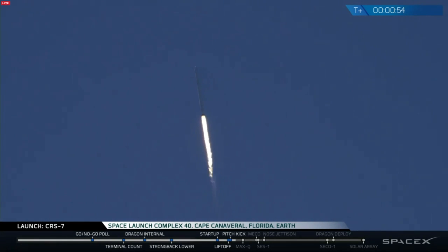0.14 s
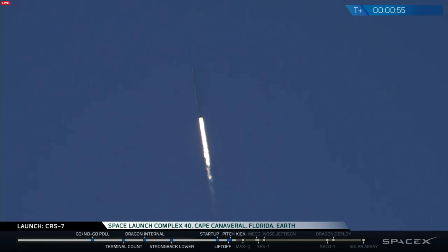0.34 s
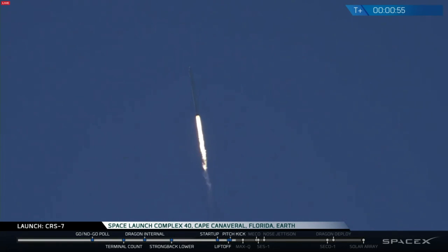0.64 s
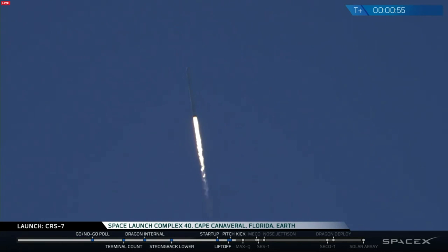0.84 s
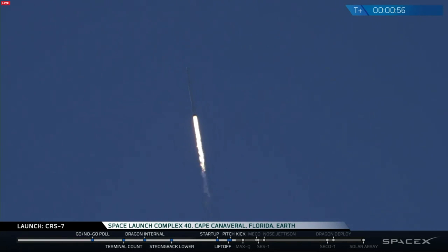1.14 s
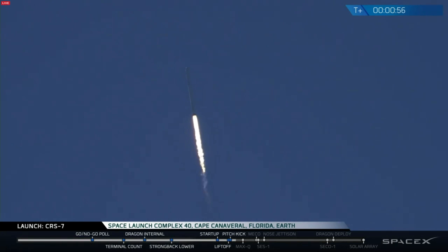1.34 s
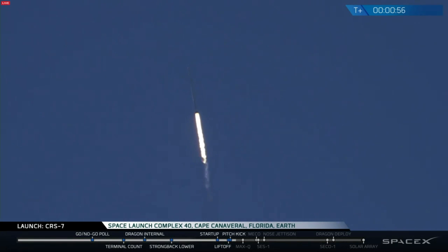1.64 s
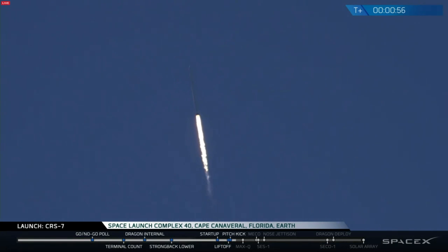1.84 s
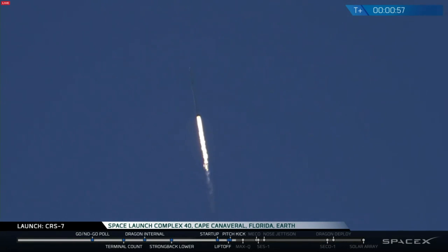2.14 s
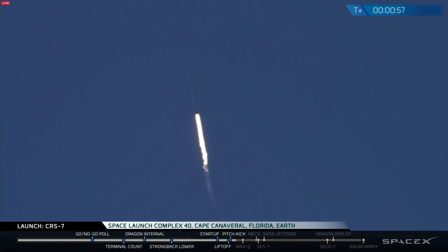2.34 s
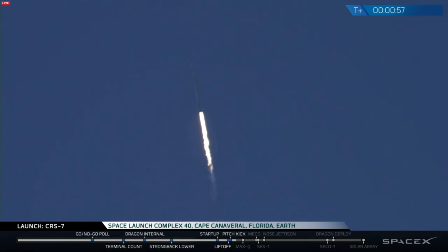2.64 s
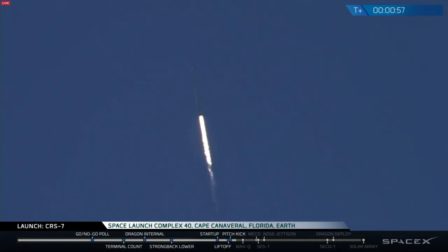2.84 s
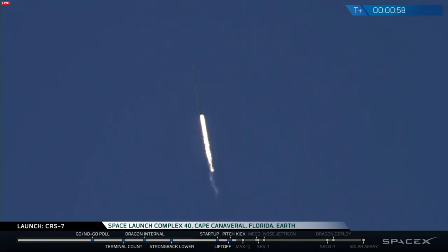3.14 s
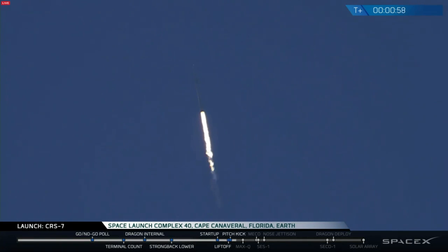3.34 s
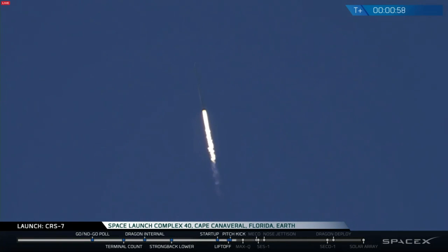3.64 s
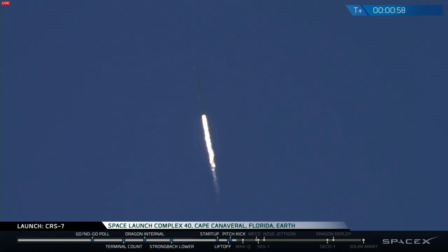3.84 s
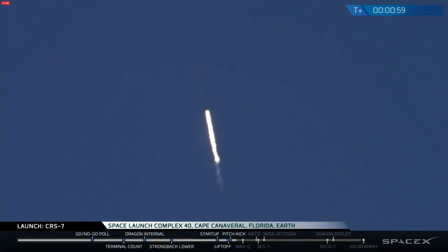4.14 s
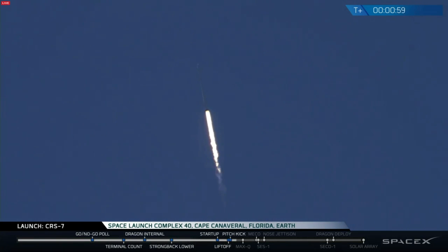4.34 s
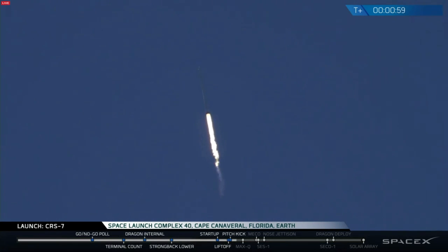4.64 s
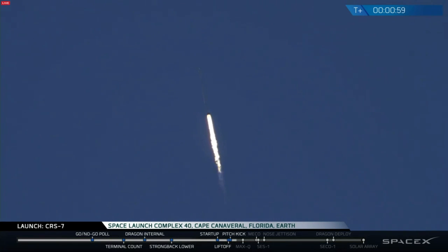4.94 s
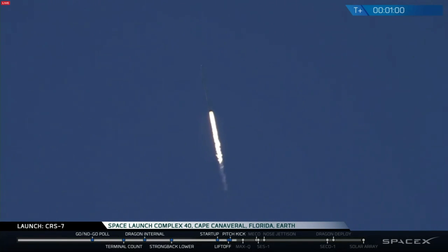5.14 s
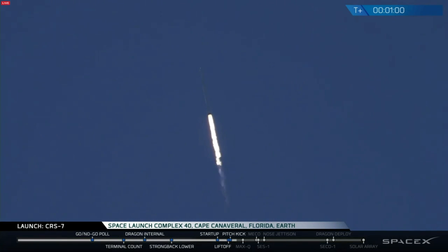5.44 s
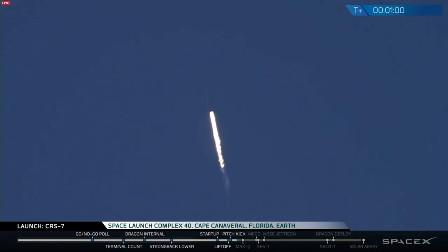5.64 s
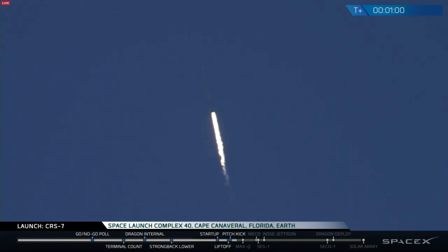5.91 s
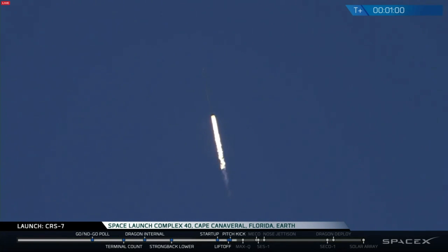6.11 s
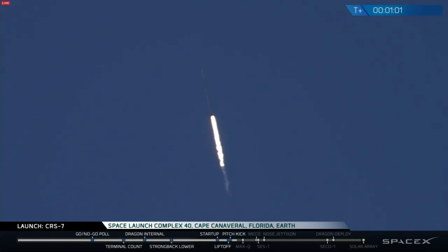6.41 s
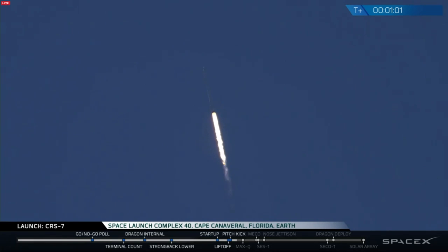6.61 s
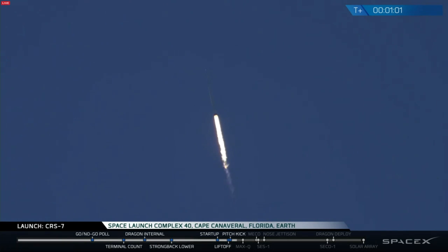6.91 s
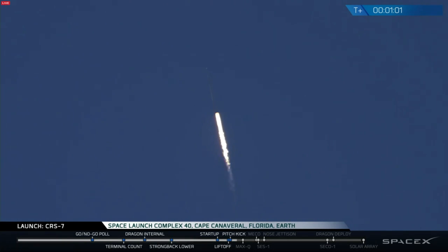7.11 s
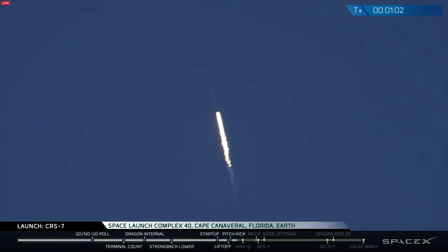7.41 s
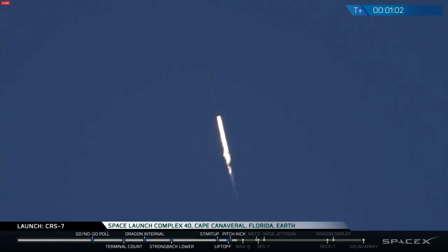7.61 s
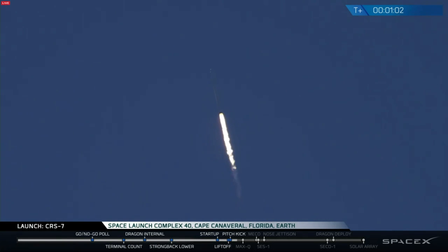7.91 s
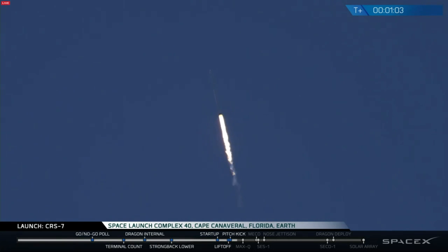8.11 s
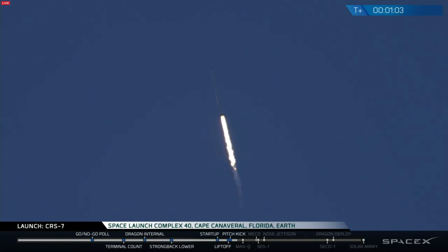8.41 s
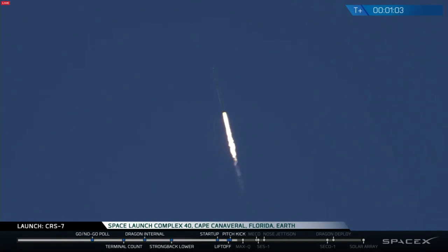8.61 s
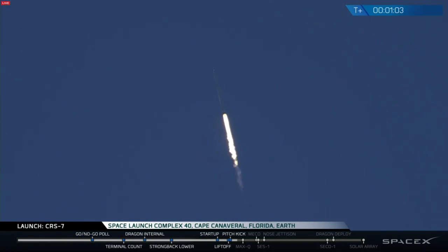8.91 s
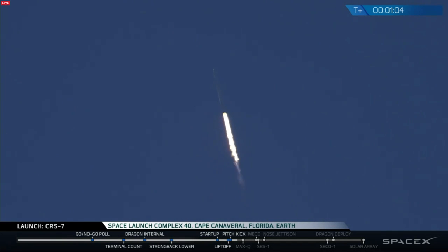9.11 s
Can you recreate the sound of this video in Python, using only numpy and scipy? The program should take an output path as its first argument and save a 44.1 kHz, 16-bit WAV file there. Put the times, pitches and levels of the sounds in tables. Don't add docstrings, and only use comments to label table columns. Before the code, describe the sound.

Heard from open ground far below, a climbing rocket gives a continuous deep bass rumble that flutters and surges. Dull crackles arrive in bunches during the first four seconds, thin out in the middle, then return as blunt thuds near the end. Faint hiss and a breathy, windy tone lie above. Dry, hard ticks from a faulty line break in irregularly. Single-channel sound, with no voice.

```python
import sys
import numpy as np
from scipy import signal
from scipy.fft import rfft, irfft
from scipy.io import wavfile
from scipy.ndimage import uniform_filter1d, map_coordinates

SR = 44100
rng = np.random.default_rng(int(sys.argv[2]) if len(sys.argv) > 2 else 0)


def volts(x):
    e = np.asarray(x, float) / 20
    return 10 ** e


def persist_wave(psi):
    counts = np.round(np.clip(psi, -1, 1) * 32767).astype(np.int16)
    wavfile.write(sys.argv[1], SR, np.atleast_2d(counts).T)


N = 408366

# time in seconds, power in dB,
# steepness in dB (how strongly the small eddies roar and shock).
PLUME = [(0, -17.5, -7), (.55, -18, -7), (.8, -16, -9.5), (1.2, -15.5, -6.5), (1.6, -15.5, -9),
         (2.0, -13.5, -8.5), (2.5, -15.5, -7.5), (3.2, -13, -10.5), (3.9, -13.5, -11), (4.3, -14.5, -11.5),
         (4.85, -13.5, -14), (5.4, -18.5, -11), (6.2, -16, -13.5), (6.9, -16.5, -12), (7.6, -12.5, -16),
         (8.2, -12.5, -9), (8.7, -13.5, -13), (9.26, -16.5, -11)]
# time in seconds, swell in dB.
EDDY_BURSTS = [(.23, 4), (.67, 7.5), (1.08, 2), (1.31, -0.5), (1.91, 2.5), (2.16, 3), (2.34, 7.5), (2.6, 4),
               (2.86, 6), (2.99, 3), (3.25, 3.5), (3.82, 2.5), (4.1, 3), (6.99, 6), (7.19, 8), (7.53, 1.5),
               (7.79, 3.5), (8.15, 2), (8.38, 4), (8.54, 4)]
# time in seconds, strength in dB, direction of the jump, sharpness in dB.
STRONG_FRONTS = [(0.3939, -15, -1, -18), (0.5093, -19, 1, -9), (0.7076, -15, -1, -19),
                 (0.7344, -15, -1, -17), (0.7493, -13, -1, -20), (0.7917, -16, -1, -16),
                 (0.844, -19, -1, -17), (0.8584, -19, -1, -18), (0.898, -21, -1, -17),
                 (0.9206, -15, -1, -14), (0.9619, -12, -1, -17), (1.0734, -16, -1, -15),
                 (1.2696, -21, -1, -18), (1.3221, -19, -1, -17), (1.9873, -18, 1, -12),
                 (2.0761, -17, 1, -15), (2.1414, -16, 1, -13), (2.178, -19, 1, -14), (2.3762, -18, 1, -10),
                 (2.5394, -16, 1, -10), (2.5783, -19, 1, -9), (3.7444, -17, 1, -22), (3.816, -15, 1, -12),
                 (3.8945, -14, 1, -8), (3.9395, -17, 1, -20), (4.0814, -14, 1, -9), (4.1307, -19, 1, -10),
                 (8.5177, -23, -1, 2), (8.6673, -18, 1, -6), (9.0216, -23, 1, -3)]
# start in seconds, end in seconds.
FRONT_SPELLS = [(.1, 1.45), (1.55, 2.9), (2.95, 3.3), (3.4, 4.15), (6.7, 7.3), (8.35, 8.8)]
# time in seconds, peak in dB.
BLUNT_FRONTS = [(4.665, -19), (4.968, -20), (5.905, -22), (5.944, -22), (6.666, -18), (7.028, -21),
                (7.238, -17), (7.58, -20), (8.01, -14), (8.204, -16), (8.248, -12), (8.274, -17),
                (8.35, -16), (8.396, -13), (8.45, -19), (8.47, -16), (8.514, -13), (8.561, -17),
                (8.663, -14), (8.717, -15), (8.751, -16), (8.787, -19), (9.017, -18), (9.053, -21),
                (9.087, -16), (9.133, -18)]
# delay in seconds, level in dB.
GROUND_ECHOES = [(.0023, -3), (.0046, -12), (.0075, -8), (.0098, -12)]
# time in seconds, delay factor, gain of the nearer reflections in dB.
CLIMB = [(0, 0.97, -13.5), (1.5, 1.02, -11), (2.4, 1, -3), (4.1, 0.99, -0.5), (6.5, 1.145, -2),
         (9.26, 1.5, -5.5)]
# frequency in Hz, density in dB per Hz.
DEEP_SPECTRUM = [(8, -17.5), (20, -7.5), (32, -7), (48, -0.5), (62, -1.5), (85, -6.5), (120, -18),
                 (200, -42)]
ROAR_SPECTRUM = [(60, -9.5), (110, 0), (170, -3.5), (240, -13.5), (300, -14.5), (430, -20.5), (520, -24),
                 (800, -33.5), (1500, -34)]
HISS_SPECTRUM = [(300, -8), (650, -5), (900, -3.5), (1150, -2), (1500, -6.5), (2800, -9), (3400, -13.5),
                 (4800, -17.5), (6000, -45)]
FIZZ_SPECTRUM = [(3500, -12), (5200, -0.5), (7000, -7.5), (9000, -13.5), (12000, -20.5), (15600, -24),
                 (15900, -60.5)]
HOWL_SPECTRUM = [(950, -20.5), (1060, 3.5), (1180, 3.5), (1320, -9.5), (1450, -21)]
# time in seconds, lift in dB.
WIND_GUSTS = [(1.1, 1), (2.4, 1), (3.6, 2.3), (4.1, 1.8), (5.1, 1), (6.15, 3.1)]
# time in seconds, swell in dB.
HOWL_SWELLS = [(.15, 10), (1.25, 11), (1.8, 6), (2.8, 8), (4.3, 3.7), (5.6, 7.1), (7.9, 5)]
# time in seconds, jump as a share of full scale, length in blocks (0: it stays).
LINE_SLIPS = [(.7214, -.6, 1), (.9489, .68, 1), (1.2254, -.23, 2), (2.46, .5, 0), (2.4629, -.48, 0),
              (2.8339, .74, 0), (3.0127, -.5, 0), (3.0154, .12, 0), (3.0209, .46, 2), (3.8334, .07, 0),
              (5.1009, .42, 2), (5.1659, -.8, 3), (5.2145, -.2, 2), (5.3283, -.68, 1), (6.2328, .25, 0),
              (6.2465, -.08, 1), (6.5984, .15, 1), (7.4002, -.84, 1), (8.1233, .08, 0), (8.3182, -.82, 1)]

SWELL_HALF_WIDTH_S, LULL_DB = 0.031, -1.13
GUST_HALF_WIDTH_S, HOWL_HALF_WIDTH_S = 0.25, 0.3
BLOCK_S = 1 / 12000


def exhaust():
    t = np.arange(N) / SR
    s, power, steepness = np.transpose(PLUME)
    power_db = np.interp(t, s, power)
    steep_db = np.interp(t, s, steepness)
    swell_db = LULL_DB + bumps(EDDY_BURSTS, SWELL_HALF_WIDTH_S)
    roar_db = power_db + steep_db + 0.41 * swell_db
    gust_db = bumps(WIND_GUSTS, GUST_HALF_WIDTH_S)
    surge = wobble(12)
    mixing = deep_rumble(power_db + swell_db) + roar(roar_db, surge)
    air = hiss(power_db, gust_db, surge) + fizz(gust_db) + howl()
    return mixing + ground_reflections(crackle(roar_db)) + air


def deep_rumble(level_db):
    noise = steadied(rush(DEEP_SPECTRUM, patchy_db=-0.63), share=0.7, window_s=0.058)
    return volts(level_db + 0.78) * noise


def roar(level_db, surge):
    noise = steadied(rush(ROAR_SPECTRUM, patchy_db=0.7), share=0.59, window_s=0.084)
    return volts(level_db + 1.5 + 1.64 * surge) * noise


def crackle(roar_db):
    s, db, sign, sharp_db = np.vstack([STRONG_FRONTS, middling_fronts()]).T
    rise = 0.00048 * volts(-0.15 * (sharp_db + 12))
    fall = 0.0018 * volts(1.5 * rng.standard_normal(len(s)))
    wake = volts(sharp_db - 0.2 * db - 6.5)
    strong = fronts(s - rise, np.sign(sign) * volts(1.2 * db + 18), rise, fall, wake)

    s, db = np.transpose(BLUNT_FRONTS)
    even = np.ones(len(s))
    crest_lag_s = 0.004
    blunt = fronts(s + crest_lag_s, volts(1.3 * db + 19.5), 0.0011 * even, 0.0018 * even, 0.08 * even)

    when, size, side, steep = rng.random((900, 4)).T
    even = np.ones(len(when))
    sizes = np.sign(side - 0.4) * volts(-5 * np.log(1 - 0.95 * size))
    weak = fronts(when * N / SR, sizes, 0.0006 + 0.00036 * steep, 0.0028 * even, 0.062 * even)

    direct = strong + blunt + volts(roar_db - 10) * unit(weak)
    return signal.lfilter(*signal.butter(2, [90, 2200], "band", fs=SR), direct)


def middling_fronts():
    gap, size, side, sharp = rng.random((400, 4)).T
    s = np.cumsum(0.4 + 1.2 * gap) / 19
    keep = np.any([(s > a) & (s < b) for a, b in FRONT_SPELLS], axis=0)
    db = -27 - 4 * np.log(1 - 0.79 * size)
    sharp_db = -14.5 + 8 * (sharp - 0.5)
    return np.transpose([s, db, side - 0.4, sharp_db])[keep]


def fronts(times, sizes, rise, fall, wake_level):
    t = np.arange(SR // 30) / SR
    u = t / fall[:, None]
    jump = (1 - np.exp(-(t / rise[:, None]) ** 2)) * (1 - u) * np.exp(-u)
    wake = signal.lfilter(*signal.butter(2, [600, 2200], "band", fs=SR), rng.standard_normal(u.shape))
    wake = wake * volts(-60 * t / 0.022)
    return place(times, sizes[:, None] * (jump + wake_level[:, None] * wake))


def ground_reflections(direct):
    t = np.arange(N) / SR
    s, factor, gain_db = np.transpose(CLIMB)
    stretch = np.interp(t, s, factor)
    fuller_db = np.interp(t, s, gain_db)
    total = direct
    for delay, db in GROUND_ECHOES:
        near = delay < 0.006
        total = total + volts(db + fuller_db * near) * np.interp(t - delay * stretch, t, direct)
    return total


def hiss(power_db, gust_db, surge):
    t = np.arange(N) / SR
    level_db = -37 - 0.5253 * t + 0.27 * (power_db - power_db.mean()) + 0.24 * gust_db
    return volts(level_db + 0.6 + 0.13 * surge + 0.34 * wobble(25)) * rush(HISS_SPECTRUM, patchy_db=0.68)


def fizz(gust_db):
    level_db = -58 - 0.16 * np.arange(N) / SR + gust_db
    return volts(level_db + 0.75 + 0.35 * wobble(10)) * rush(FIZZ_SPECTRUM, patchy_db=1.05)


def howl():
    level_db = -53.5 + bumps(HOWL_SWELLS, HOWL_HALF_WIDTH_S)
    return volts(level_db) * rush(HOWL_SPECTRUM, patchy_db=3.0)


def line_slips():
    s, jump, blocks = np.transpose(LINE_SLIPS)[..., None]
    w = 2j * np.pi * np.fft.rfftfreq(N, 1 / SR)
    length = np.round(blocks) * BLOCK_S
    undone = (length > 0) * np.exp(-w * length)
    edges = np.sum(jump * np.exp(-w * s) * (1 - undone), axis=0)
    sag = 0.88 / (w + 1 / 0.000045) + 0.17 / (w + 1 / 0.003)
    steep_cut = 1 / (1 + np.abs(w / (2 * np.pi * 15600)) ** 24)
    gentle_cut = 1 / (1 + w / (2 * np.pi * 14000))
    return 1.1 * SR * irfft(edges * sag * steep_cut * gentle_cut, N)


def rush(spectrum, patchy_db):
    z = signal.stft(rng.standard_normal(N + 512), nperseg=512)[2]
    field = uniform_filter1d(rng.standard_normal(z.shape), size=5, axis=0)
    field = uniform_filter1d(field, size=10, axis=1)
    noise = signal.istft(z * volts(patchy_db * unit(field)), nperseg=512)[1][:N]
    hz, db = np.transpose(spectrum)
    grid = np.fft.rfftfreq(N, 1 / SR)
    colour_db = np.interp(np.log(grid + 1), np.log(hz), db, left=-120, right=-120)
    return unit(irfft(rfft(noise) * volts(colour_db), N))


def steadied(x, share, window_s):
    size = round(window_s * SR)
    power = uniform_filter1d(uniform_filter1d(x * x, size=size), size=size)
    return unit(x / (np.abs(power) + 0.02) ** (share / 2))


def bumps(rows, half_width_s):
    t = np.arange(N) / SR
    return sum(high * np.exp(-((t - s) / half_width_s) ** 2) for s, high in rows)


def wobble(rate):
    knots = rng.standard_normal(int(N * rate / SR) + 4)
    return map_coordinates(knots, [np.arange(N) * rate / SR])


def place(times, shapes):
    at = np.round(times * SR).astype(int)[:, None] + np.arange(shapes.shape[1])
    return np.bincount(at.ravel(), shapes.ravel(), N + SR)[:N]


def unit(x):
    return x / np.sqrt(np.mean(x ** 2) + 1e-20)


def scene():
    return exhaust()[None]


def band_limit(x):
    return signal.sosfilt(signal.butter(12, 16660, fs=SR, output="sos"), x)


def record(dry):
    loud = dry + line_slips()
    soft = loud / (1 + np.abs(loud / 0.76) ** 6) ** (1 / 6)
    return band_limit(soft)


dry = scene()
out = record(dry)
persist_wave(out)
```